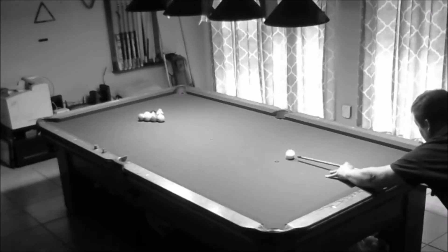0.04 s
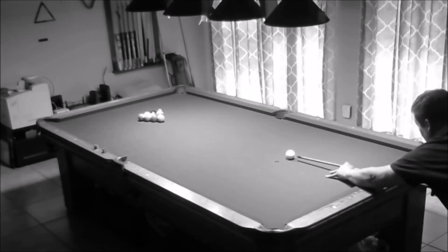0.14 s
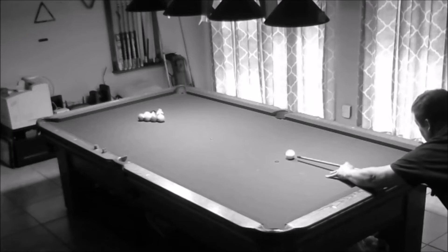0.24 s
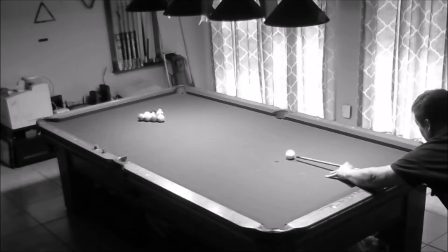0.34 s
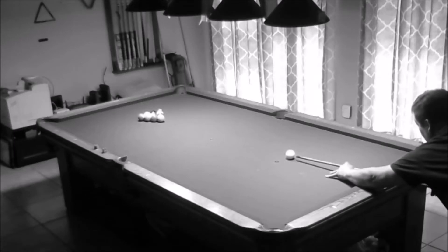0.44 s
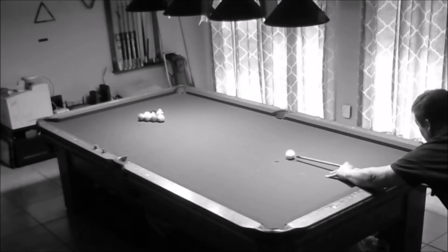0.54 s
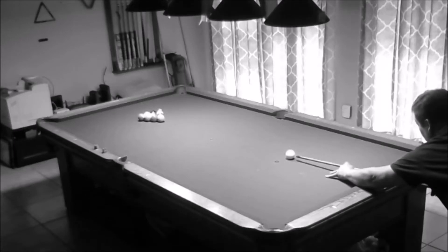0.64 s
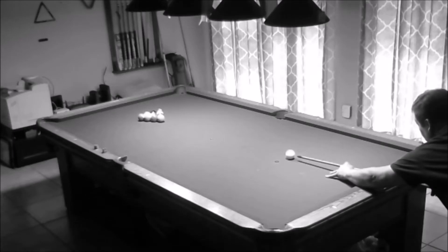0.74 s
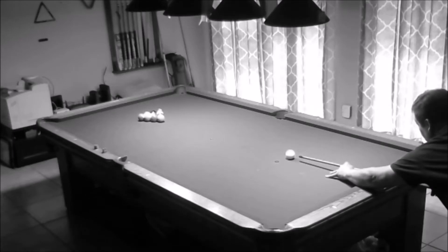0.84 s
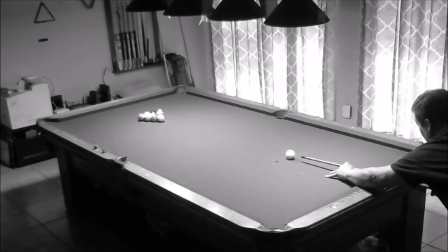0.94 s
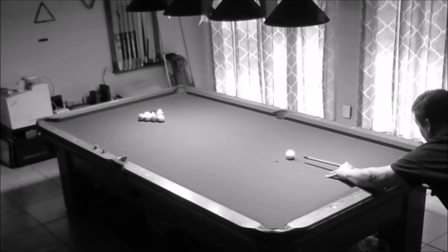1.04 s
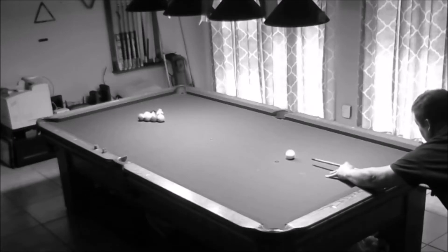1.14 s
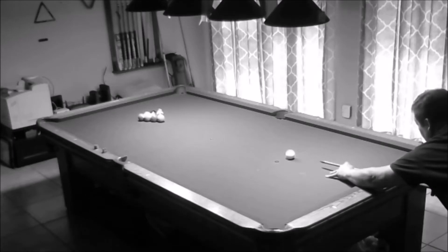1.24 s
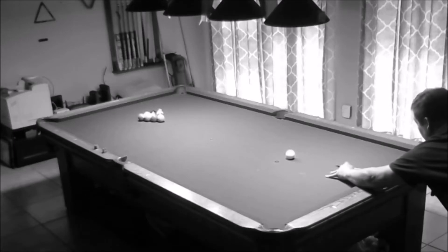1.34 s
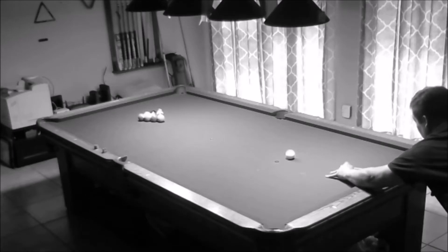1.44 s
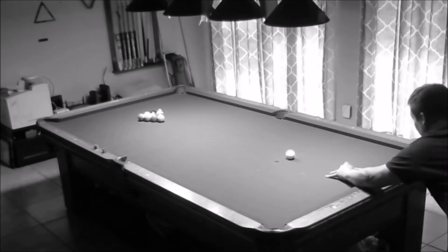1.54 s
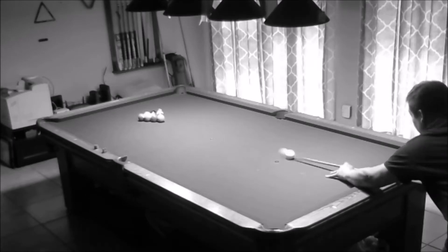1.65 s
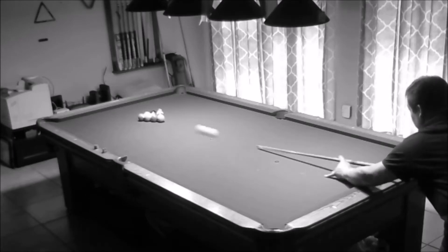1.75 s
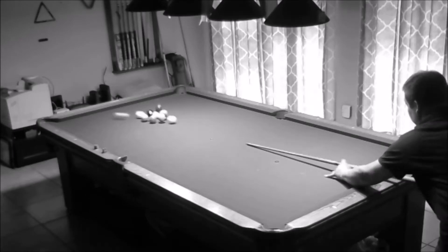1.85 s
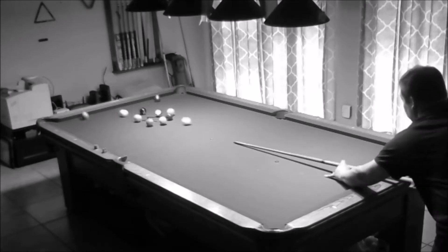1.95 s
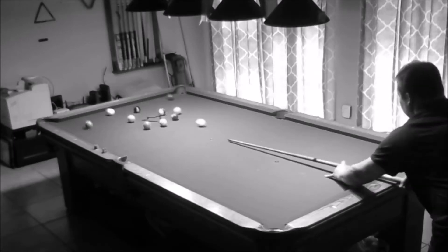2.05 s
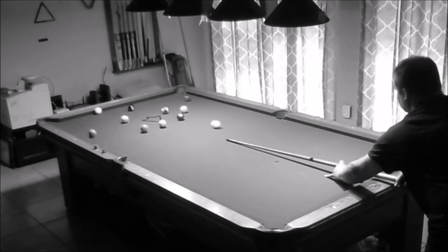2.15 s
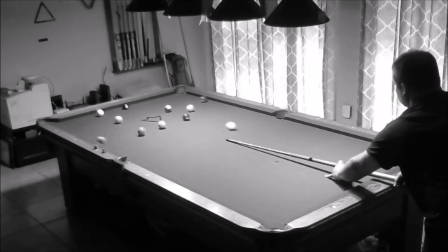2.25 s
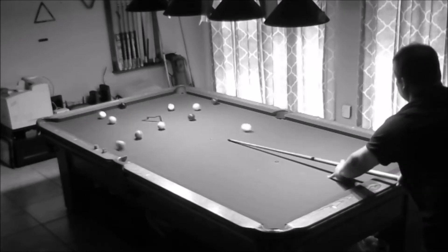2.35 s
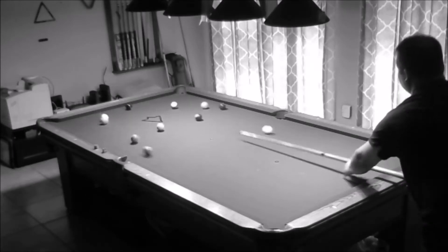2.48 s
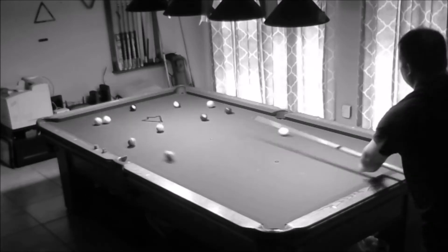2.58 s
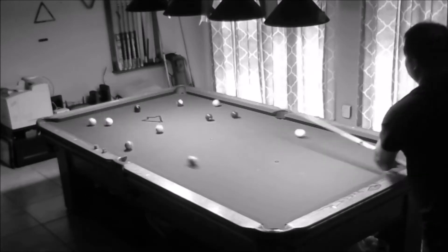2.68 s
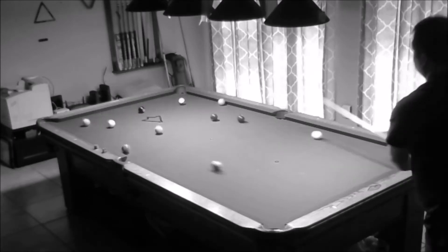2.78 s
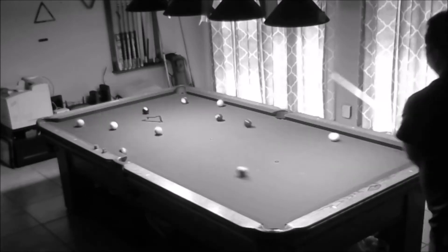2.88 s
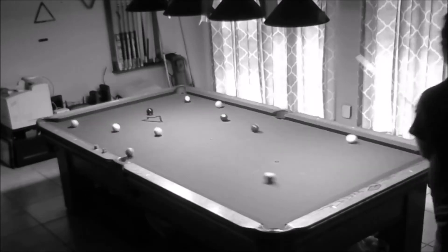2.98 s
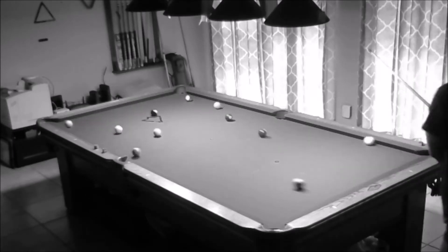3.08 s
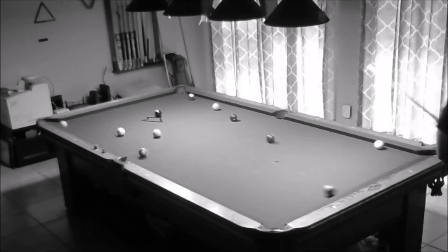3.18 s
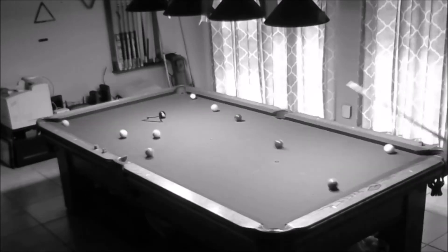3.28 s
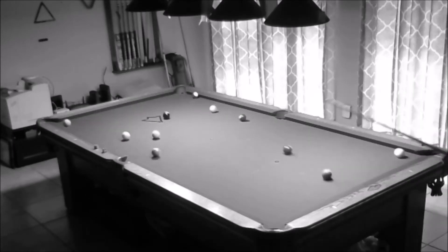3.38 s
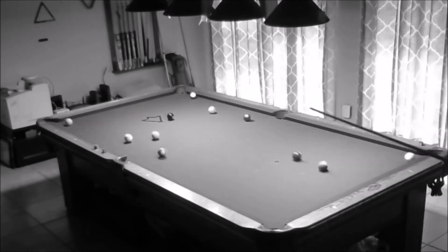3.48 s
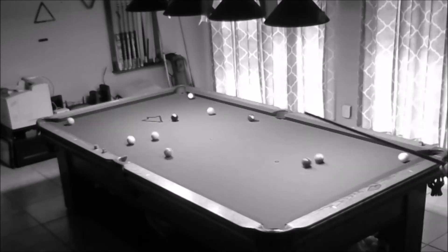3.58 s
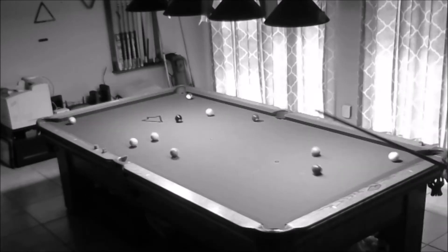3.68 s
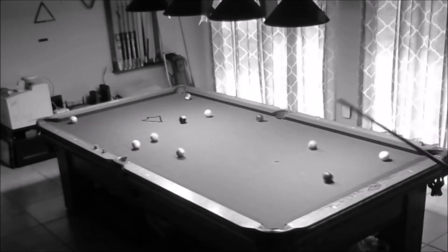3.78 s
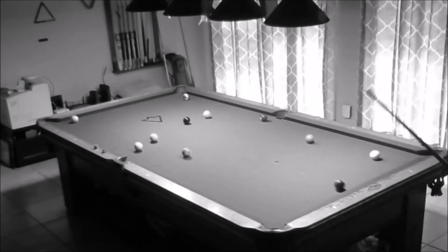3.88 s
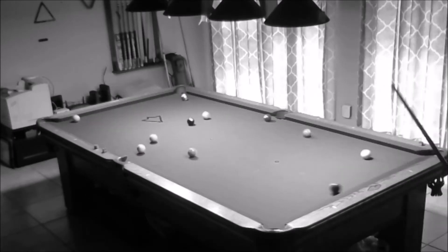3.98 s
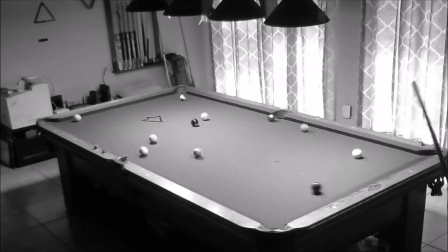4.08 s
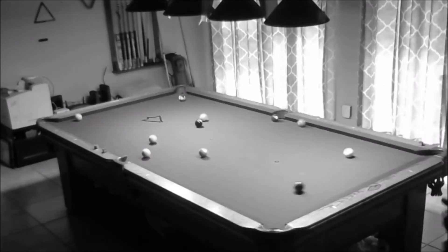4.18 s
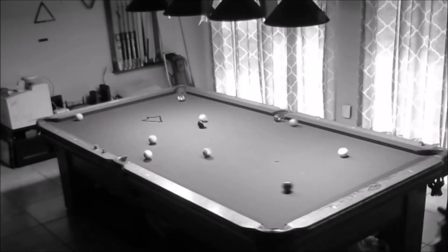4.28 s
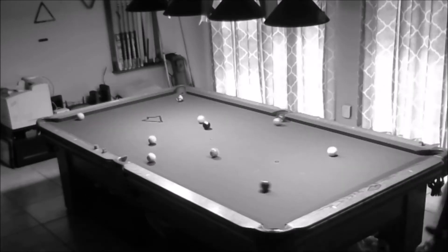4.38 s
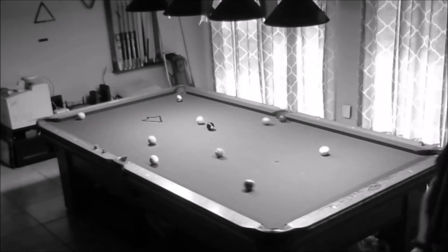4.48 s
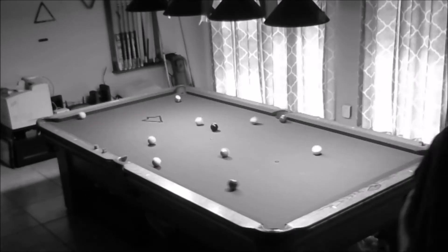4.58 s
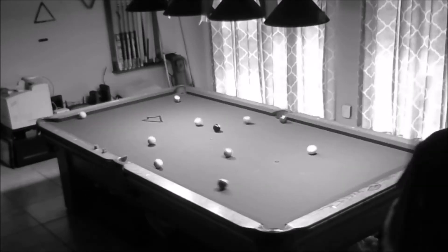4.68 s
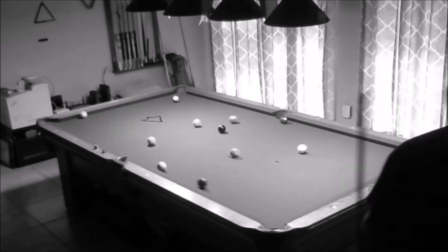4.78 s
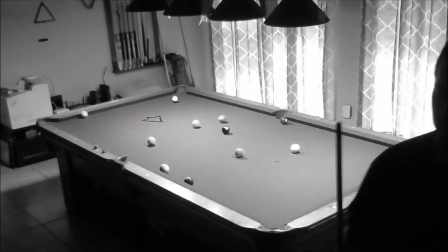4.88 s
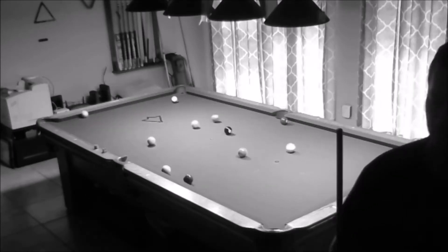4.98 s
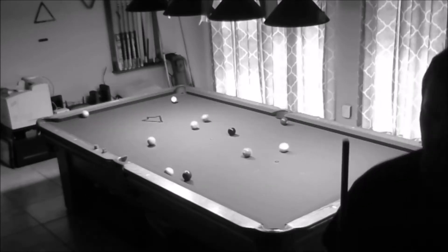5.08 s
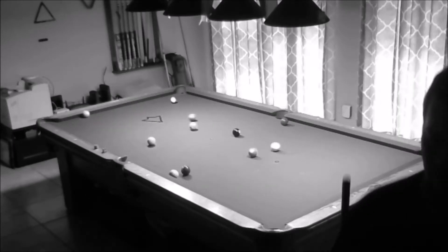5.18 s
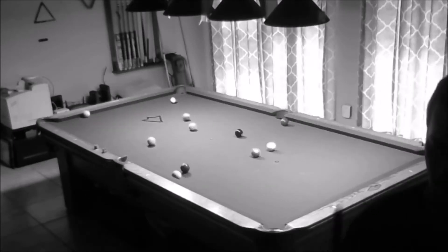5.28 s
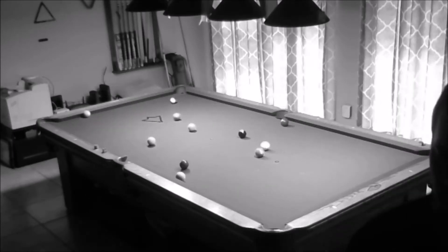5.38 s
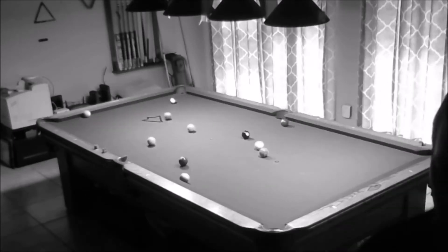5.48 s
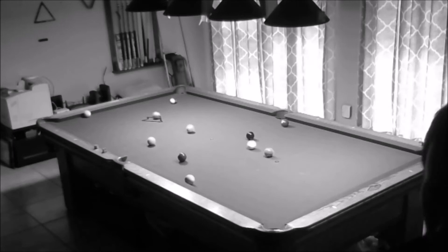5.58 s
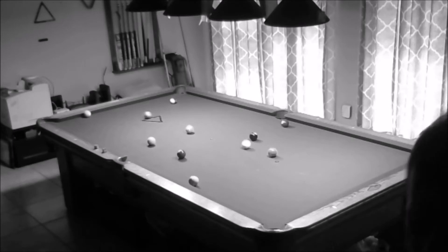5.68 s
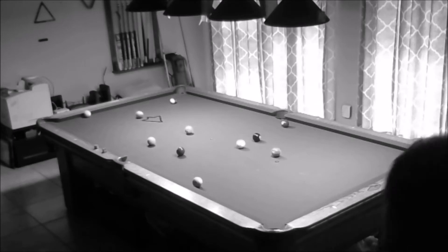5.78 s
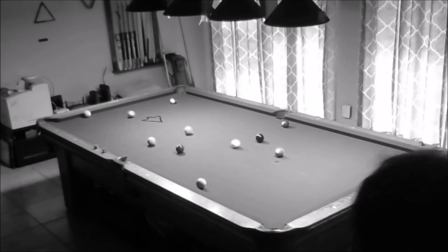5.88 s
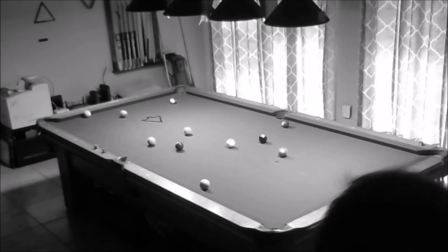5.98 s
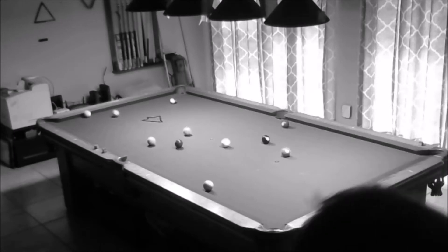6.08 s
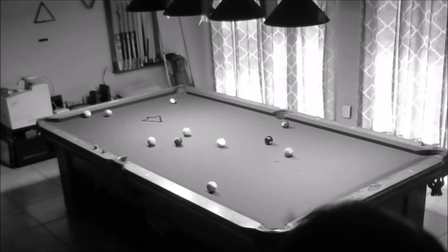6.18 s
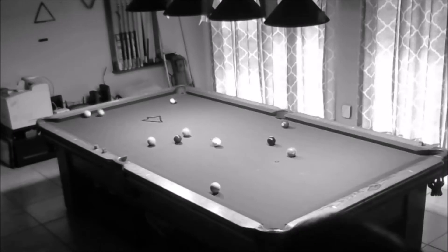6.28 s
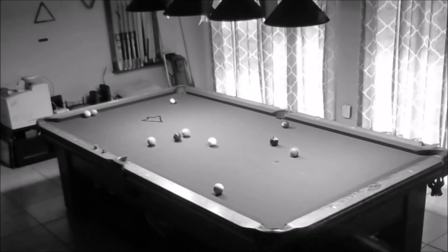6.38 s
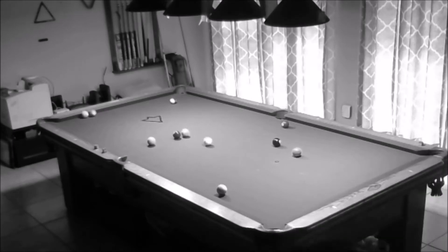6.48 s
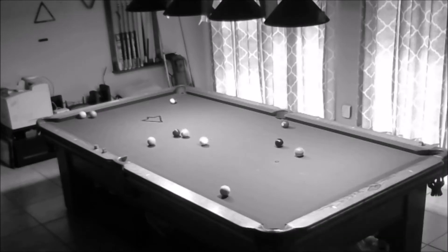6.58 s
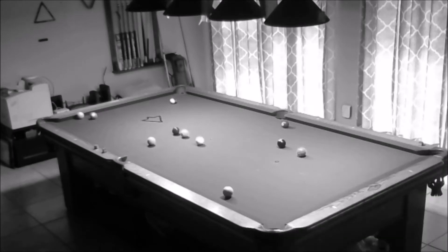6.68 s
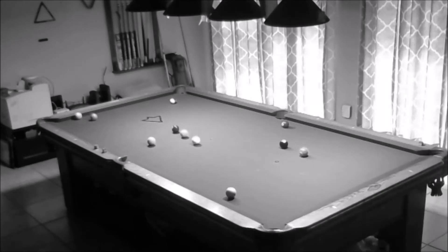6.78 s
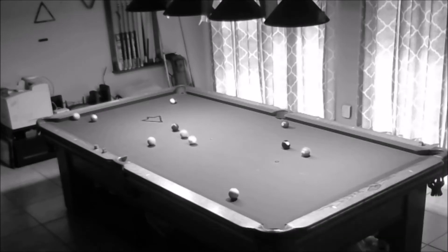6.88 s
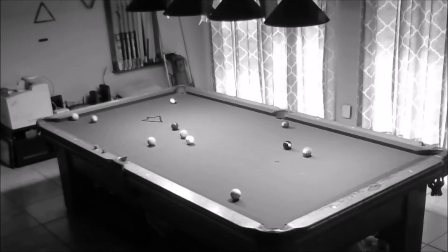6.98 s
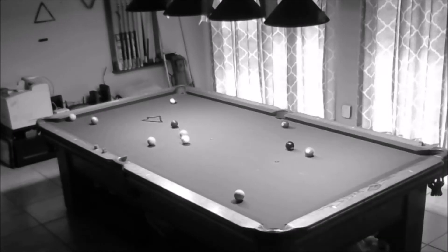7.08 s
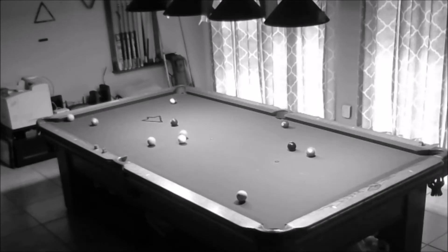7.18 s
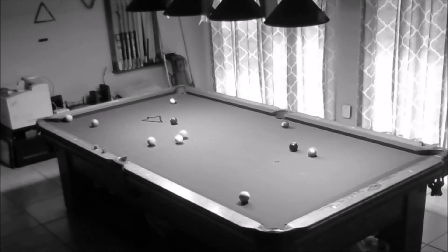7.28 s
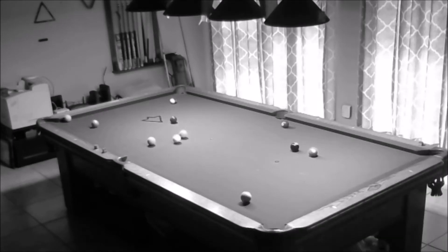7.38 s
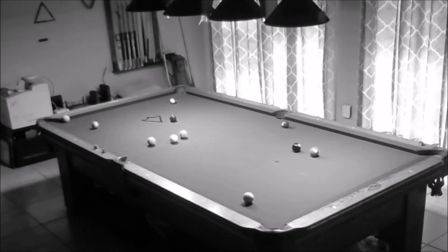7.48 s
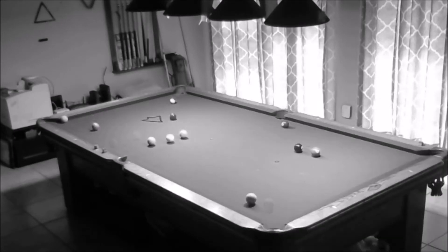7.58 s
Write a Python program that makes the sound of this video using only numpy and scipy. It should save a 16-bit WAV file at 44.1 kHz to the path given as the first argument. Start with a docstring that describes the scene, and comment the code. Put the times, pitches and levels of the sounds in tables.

```python
"""Dull bumps on a hand-held camera over the low rumble and hiss of a tiled game room, then a pool break:
the cue cracks on the white, which skims the slate and smashes the rack. Balls thud into the cushions,
drone as they roll and click together; two hard knocks come late. Each hit is a noise crack with echoes
and a room tail, coloured by what is struck. The camera's two microphone ports are summed, which hollows
out the sound; a noise suppressor shortens the tails and the break overloads the input."""
import sys
import numpy as np
from scipy import signal
from scipy.fft import rfft, irfft, next_fast_len
from scipy.io import wavfile
from scipy.ndimage import uniform_filter1d, map_coordinates

SR = 44100
rng = np.random.default_rng(int(sys.argv[2]) if len(sys.argv) > 2 else 0)


def unload_wav(signal):
    """Save mono or channel-first audio to the path in sys.argv[1] as 16-bit WAV at rate SR, clipped to [-1, 1]."""
    wavfile.write(
        sys.argv[1],
        SR,
        np.round(np.clip(np.atleast_2d(signal).T, -1, 1) * 32767).astype(np.int16),
    )


N = 336924

# Hits, balanced within each layer: (time [s], relative level [dB])
RACK_HITS = [(1.8073, 1), (1.8165, -2), (1.820, 0.5), (1.825, .5), (1.834, -6), (1.844, -4.5),
             (1.851, -6.5), (1.868, -5.5)]  # contacts inside the bursting rack
CUE_HITS = [(1.6493, -4)]  # tip on the white
CUSHION_HITS = [(1.917, -21), (1.945, -22.5), (1.972, -27), (2.0, -24), (2.04, -30.5), (2.122, -38.5),
                (2.938, -44), (3.025, -45.5), (3.275, -40.5), (3.538, -49)]  # balls on the rubber
CLACK_HITS = [(6.2024, -27), (6.2652, -33.5)]  # late hard knocks
# Light touches of balls and cue: (time [s], relative level [dB], centre [Hz], width [octaves])
TICKS = [(.42, -60, 3830, 0.11), (1.378, -57, 6193, .22), (2.866, -48, 5410, .4),
         (3.815, -54.5, 6000, 0.25), (3.858, -46, 4816, .5), (4.714, -43, 4400, 0.41),
         (4.76, -55.5, 5070, .45), (5.35, -54, 6100, 0.26), (5.36, -52.5, 3099, .18),
         (6.42, -43, 1950, .42), (6.448, -44, 1650, .28), (7.10, -54, 1240, .17), (7.139, -45, 476, 0.26)]
# Pushes of the hand on the camera: (time [s], relative level [dB], half length [s])
BUMPS = [(0.408, -39, 0.0061), (.476, -37.5, 0.0042), (.62, -35, 0.0028), (.666, -35.5, .008),
         (.894, -32.5, 0.0026), (1.081, -26, 0.0018), (1.472, -31.5, 0.0096), (2.361, -34.5, .0064),
         (2.801, -39, .004), (3.114, -32, 0.0041), (3.145, -30.5, 0.0029), (3.301, -34.5, 0.0057),
         (3.592, -26.5, 0.0019), (4.06, -17.5, 0.0015), (4.629, -25, .0024), (4.747, -29.5, 0.0073),
         (4.778, -31.5, 0.0043), (4.829, -36.5, 0.0032), (4.937, -33.5, .002), (5.142, -24, 0.0021),
         (5.245, -38.5, 0.0037), (5.515, -23, 0.0012), (5.646, -27.5, 0.0029), (5.931, -29, 0.0037),
         (6.123, -30, 0.0027), (6.563, -25.5, .0022), (6.758, -33.5, 0.0046), (6.921, -36.5, 0.0039)]
# Broad tone colour of each sound: (frequency [Hz], relative level [dB])
RACK_COLOUR = [(40, -44), (200, -29), (450, -21), (800, -12), (1300, -6.5), (2000, 1.5), (2900, -3.5),
               (4200, -11), (6000, -19), (7200, -27.5), (8500, -42), (16000, -61.5)]
CUE_COLOUR = [(40, -36.5), (150, -16), (450, -11), (800, -9.5), (1400, -11), (2000, -12), (2900, -6.5),
              (4200, -4.5), (5000, -6.5), (6800, -2), (8200, -18.5), (11000, -32), (16000, -48.5)]
CUSHION_COLOUR = [(30, -50.5), (55, -27), (90, -11), (200, -8), (380, 1.5), (550, -3), (900, -13),
                  (2500, -44), (8000, -79.5)]
CLACK_COLOUR = [(60, -33), (250, -30.5), (400, 13.5), (520, 8.5), (900, -5), (1500, -12.5), (2200, -1.5),
                (3100, -4.5), (4400, -4.5), (5800, -5.5), (7200, -8.5), (8700, -25), (12000, -44),
                (16000, -48)]
SLATE_COLOUR = [(100, -26.5), (190, -14), (265, 0), (320, -6), (380, -10), (460, -21), (800, -44.5),
                (2000, -80.5)]
SHUDDER_COLOUR = [(25, -23), (60, -5.5), (125, 2.5), (220, -2), (310, -13.5), (450, -27.5), (700, -57),
                  (2000, -92.5)]
RUMBLE_COLOUR = [(20, -42.5), (45, -18), (70, -9), (120, -1.5), (190, -5.5), (260, -13.5), (400, -22),
                 (700, -50), (2000, -91)]
DRONE_COLOUR = [(100, -24.5), (190, -9.5), (255, 1.5), (310, -11), (360, -1), (440, -11), (550, -19.5),
                (800, -40.5), (2000, -80.5)]
HISS_COLOUR = [(100, -3), (600, 5.5), (1300, -1), (2000, -6), (2800, -8.5), (4200, -12), (5700, -11),
               (7200, -16.5), (8500, -30.5), (15000, -32)]
# Resonances ringing on top of the colour: (frequency [Hz], width [Hz], lift [dB])
RACK_RING = [(1410, 80, 3.5), (1720, 40, 1.3), (2656, 50, 6.5), (2690, 40, 4), (2875, 90, 7), (4250, 60, 3),
             (4500, 45, 5)]
CUE_RING = [(1330, 91, 3.5), (1556, 60, 5), (3077, 120, 5), (4120, 81, 9), (4230, 55, 6.5), (5545, 70, 1),
            (6130, 100, 7)]
CLACK_RING = [(463, 100, 3), (1252, 60, 8), (1439, 60, 7), (2100, 60, 5), (3190, 110, 8), (4540, 105, 8.07),
              (5990, 70, 3), (6670, 110, 3)]
# Early reflections off table, lamps, ceiling and wall: (delay [s], relative level [dB])
ECHOES = [(0.0107, -3.5), (.020, -7.5), (.0335, -8.5), (.043, -11.5)]
# Reverb of the tiled room: (frequency [Hz], time to fall 60 dB [s])
ROOM_T60 = [(100, 0.99), (400, 0.72), (1400, 0.56), (2800, 0.51), (5500, 0.44), (8000, 0.34), (14000, 0.27)]

CUE_S, BREAK_S, STILL_S = CUE_HITS[0][0], RACK_HITS[0][0], 6.95  # the hand rests at STILL_S
TIME = np.arange(N) / SR


def amp(db):
    return 10 ** (np.asarray(db) / 20)


def unit_rms(x):
    return x / np.sqrt(np.mean(x ** 2) + 1e-20)


def along(points, hz):
    """Read a curve of (frequency [Hz], value) points on a log axis."""
    freqs, values = np.transpose(points)
    return np.interp(np.log(hz + 1), np.log(freqs + 1), values)


def add(track, time_s, sound):
    """Mix a sound into the track from time_s on."""
    start = max(round(time_s * SR), 0)
    track[start:start + len(sound)] += sound[:max(N - start, 0)]


def wobble(rate):
    """A smooth random curve, rate knots a second."""
    knots = rng.standard_normal(int(N * rate / SR) + 4)
    return map_coordinates(knots, [TIME * rate])


def coloured(x, gain_of_hz):
    """Minimum-phase EQ that keeps the power of white noise."""
    size = 2 * next_fast_len(len(x) // 2 + 2048)
    gain = np.maximum(unit_rms(gain_of_hz(np.fft.rfftfreq(size, 1 / SR))), 1e-6)
    cepstrum = irfft(np.log(gain))
    cepstrum[1:size // 2] *= 2  # folded forward, so nothing rings ahead of a hit
    cepstrum[size // 2 + 1:] = 0
    return irfft(rfft(x, size) * np.exp(rfft(cepstrum)))[:len(x)]


def noise(colour):
    """Steady coloured noise of rms 1."""
    return unit_rms(coloured(rng.standard_normal(N), lambda hz: amp(along(colour, hz))))


def impact(t60_s, echo_db, room_db, rise_s):
    """A colourless hit: a short crack, its repeats off near surfaces, then the diffuse room."""
    t = np.arange(SR * 3 // 4) / SR

    def crack(age):
        attack = 1 - np.exp(-np.maximum(age, 0) / rise_s)
        return attack * amp(-60 * np.maximum(age - rise_s, 0) / t60_s)

    echo_power = sum((amp(db + echo_db) * crack(t - delay)) ** 2 for delay, db in ECHOES)
    envelope = np.sqrt(crack(t) ** 2 + echo_power)
    hz, frame_s, bands = signal.stft(rng.standard_normal(len(t)), SR, nperseg=256)
    decay = amp(-60 * frame_s / along(ROOM_T60, hz)[:, None])
    tail = signal.istft(bands * decay, SR, nperseg=256)[1][:len(t)]
    build_up = 1 - np.exp(-t / (0.022 + rise_s))
    return envelope * rng.standard_normal(len(t)) + amp(room_db) * build_up * tail


def impacts(hits, colour, ring, **envelope):
    """A run of hits on one kind of body, with its broad colour and narrow resonances."""
    track = np.zeros(N)
    for time_s, db in hits:
        add(track, time_s, amp(db) * impact(**envelope))
    lift = lambda hz: sum(db / (1 + (2 * (hz - centre) / width) ** 2) for centre, width, db in ring)
    return coloured(track, lambda hz: amp(along(colour, hz) + lift(hz)))


def rack():
    """Ball smacks ball in a rapid chain as the triangle bursts."""
    return amp(5.5) * impacts(RACK_HITS, RACK_COLOUR, RACK_RING,
                              t60_s=0.026, echo_db=-8.5, room_db=-14, rise_s=0.0007)


def cue():
    """The tip meets the white ball with a bright, dry crack."""
    return amp(5) * impacts(CUE_HITS, CUE_COLOUR, CUE_RING,
                            t60_s=0.01976, echo_db=0, room_db=-9.5, rise_s=0.0021)


def cushions():
    """Scattering balls thud against the rubber rails."""
    return impacts(CUSHION_HITS, CUSHION_COLOUR, ring=[],
                   t60_s=0.081, echo_db=7, room_db=-6, rise_s=0.0025)


def clacks():
    """A hard, ringing knock and a softer second one."""
    return amp(4) * impacts(CLACK_HITS, CLACK_COLOUR, CLACK_RING,
                            t60_s=0.11, echo_db=-6.5, room_db=-12.5, rise_s=0.000722)


def skid():
    """The white skims over the slate; the rush dies away once it meets the rack."""
    fade_in = np.clip((TIME - CUE_S) / 0.027, 0, 1)
    fade_out = amp(-60 * np.maximum(TIME - BREAK_S, 0) / 0.35)
    return amp(-30) * fade_in * fade_out * noise(CUSHION_COLOUR)


def ticks(faint_db=-66):
    """Light touches click in one band each, sharper and shorter the firmer they are."""
    track = np.zeros(N)
    for time_s, db, centre_hz, octaves in TICKS:
        firmer_db = db - faint_db
        rise_s = 0.0049 * 0.5 ** (firmer_db / 7.5)
        t60_s = 0.138 * 0.5 ** (firmer_db / 46)
        click = impact(t60_s, echo_db=-0.5, room_db=-10.5, rise_s=rise_s)
        band = lambda hz: np.exp(-0.5 * (np.log2((hz + 1) / centre_hz) / octaves) ** 2)
        add(track, time_s, amp(db) * coloured(click, band))
    return track


def rolling(peak_s=3.3, rise_db_per_s=12, fall_db_per_s=8):
    """The scattered balls drone on the slate, swelling as they come near and fading as they slow."""
    past_peak = TIME - peak_s
    level_db = -48 + np.minimum(rise_db_per_s * past_peak, -fall_db_per_s * past_peak)
    return (TIME > BREAK_S) * amp(level_db + 1.2 * wobble(29)) * noise(SLATE_COLOUR)


def handling(body_hz=145, firm_db=-28.5, nudges_per_s=2):
    """The hand pushes and releases the camera body: dull bumps, each inside a brief shudder."""
    pushes, shudder_level = np.zeros(N), np.zeros(N)
    lead_s = 0.12  # the shudder swells ahead of the push
    t = np.arange(SR // 3) / SR - lead_s
    shudder = noise(SHUDDER_COLOUR)
    swing = np.sin(2 * np.pi * body_hz * t)
    swell = np.exp(np.minimum(t / 0.028, -t / 0.073))
    # faint, irregular shifts of the grip until the hand rests
    nudges = [((slot + offset) / nudges_per_s, -40.5 + 2 * force, 0.004)
              for slot, (offset, force) in enumerate(rng.random(size=(40, 2)))]
    for time_s, db, half_s in BUMPS + [row for row in nudges if row[0] < STILL_S]:
        add(pushes, time_s - lead_s, amp(db) * swing * np.exp(-0.5 * (t / half_s) ** 2))
        add(shudder_level, time_s - lead_s, amp(-40 + 0.75 * (db - firm_db)) * swell)
    body_band = signal.butter(3, (50.02, 520), "bandpass", fs=SR, output="sos")
    return signal.sosfilt(body_band, amp(3) * pushes + shudder_level * shudder)


def background():
    """A bed of even hiss, lumpy rumble and faint drone; the low end sinks once the hand is still."""
    settle_db = -2 * np.clip((TIME - STILL_S) / 0.2, 0, 1)
    rumble = amp(-51 + 2.5 * wobble(24)) * noise(RUMBLE_COLOUR)
    drone = amp(-55.5 + 2 * wobble(24)) * noise(DRONE_COLOUR)
    hiss = amp(-53.5) * noise(HISS_COLOUR)
    return amp(settle_db) * (rumble + drone) + hiss


def scene():
    """The pool table, the room bed and the handling, mixed in mono."""
    table = cue() + skid() + rack() + cushions() + clacks() + ticks() + rolling()
    return (table + background() + handling())[None]


def suppress(x, depth_db, shut_db, span_db):
    """Noise suppressor: bands that stay near their usual level are turned down."""
    bands = signal.stft(x, nperseg=512)[2]
    power = uniform_filter1d(np.abs(bands) ** 2, size=9, axis=-2)  # smooth across frequency
    power = np.abs(uniform_filter1d(power, size=4, axis=-1)) + 1e-20  # then across time
    excess_db = 10 * np.log10(power / np.median(power, axis=-1, keepdims=True))
    opening = np.clip((excess_db - shut_db) / span_db, 0, 1)
    return signal.istft(bands * amp(depth_db * (1 - opening)), nperseg=512)[1][..., :N]


def record(dry):
    """Two ports sum into a hollow comb; then noise suppression, overload and band limits."""
    port_lag_samples, input_db = 31, 1.56
    far_port = amp(-0.03) * np.pad(dry, ((0, 0), (port_lag_samples, 0)))[:, :N]
    hollow = amp(input_db) * (dry + far_port) / 2
    gated = suppress(hollow, depth_db=-13.5, shut_db=2.5, span_db=15)
    clipped = np.clip(gated, -0.97, 0.97)
    low_cut = signal.butter(2, 38, "highpass", fs=SR, output="sos")
    high_cut = signal.firwin(401, 15900, fs=SR)
    return signal.fftconvolve(signal.sosfilt(low_cut, clipped), high_cut[None], mode="same", axes=1)


dry = scene()
out = record(dry)
unload_wav(out)
```